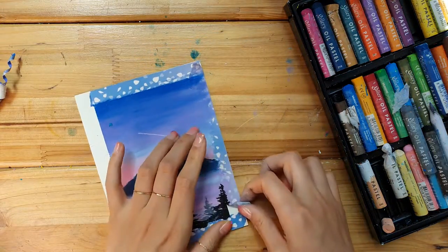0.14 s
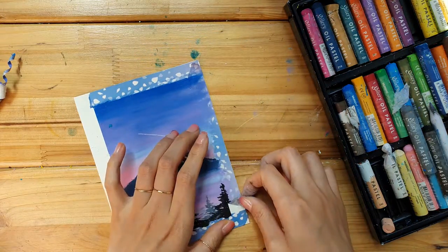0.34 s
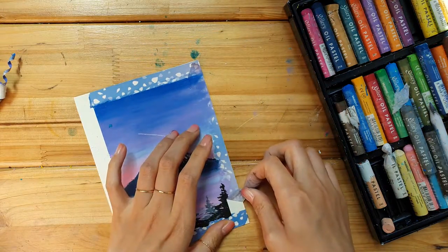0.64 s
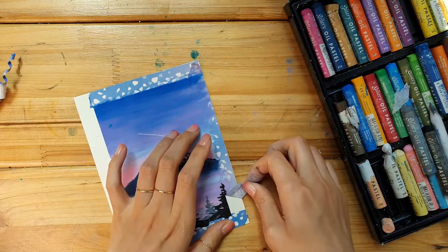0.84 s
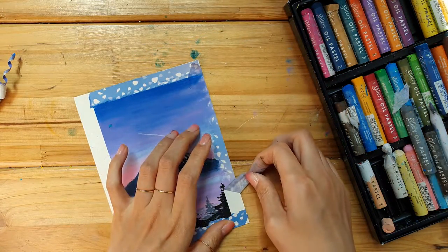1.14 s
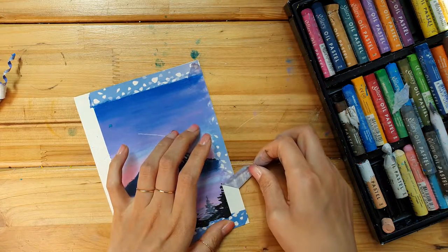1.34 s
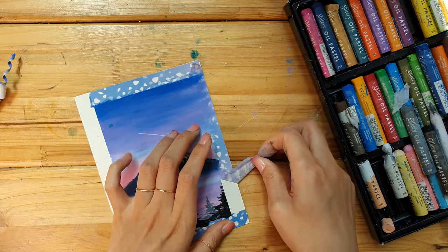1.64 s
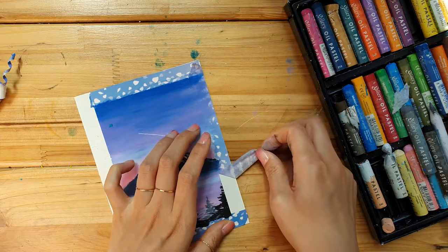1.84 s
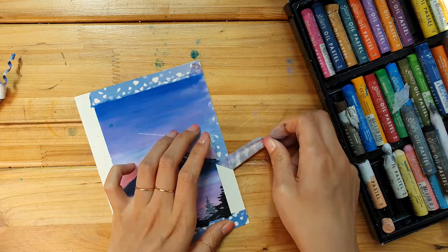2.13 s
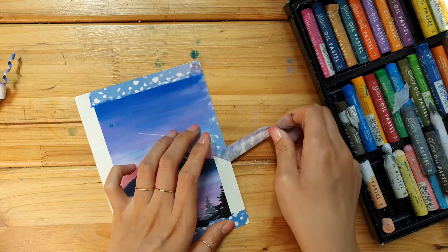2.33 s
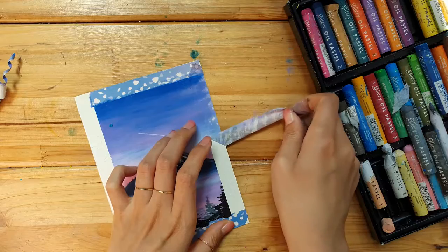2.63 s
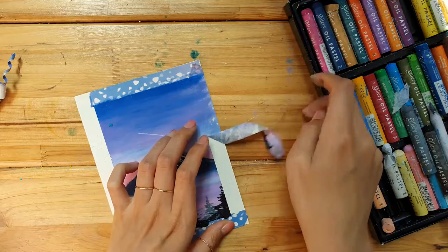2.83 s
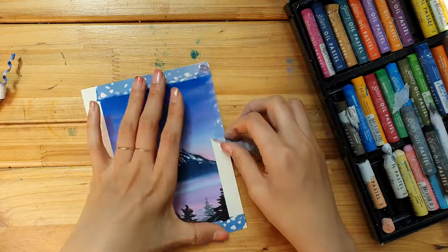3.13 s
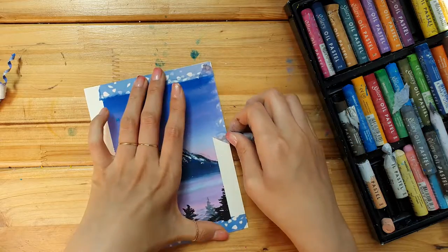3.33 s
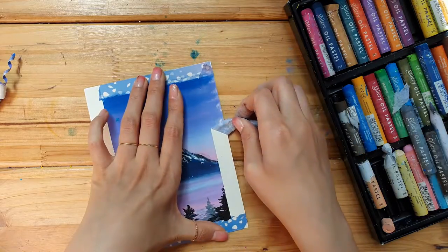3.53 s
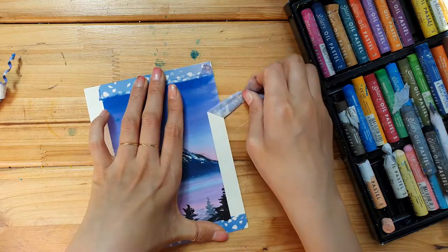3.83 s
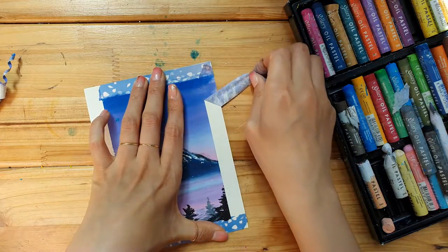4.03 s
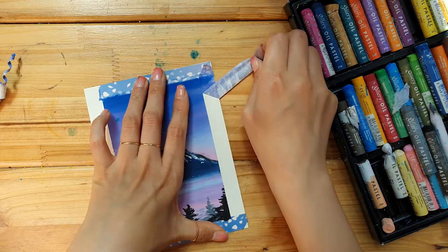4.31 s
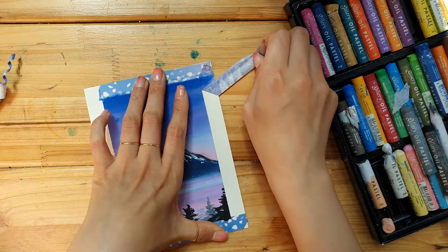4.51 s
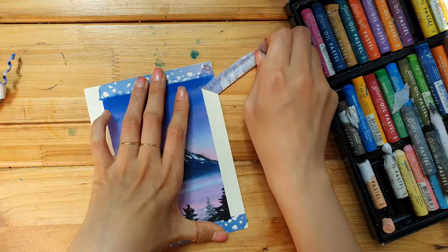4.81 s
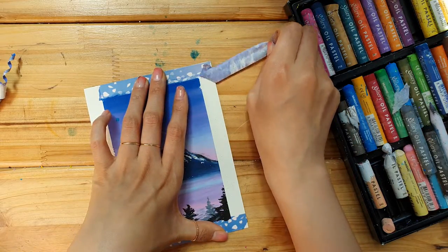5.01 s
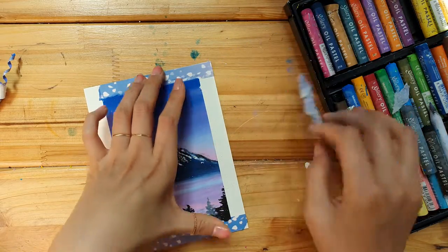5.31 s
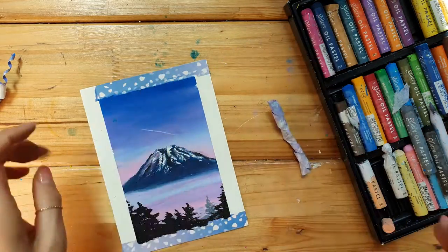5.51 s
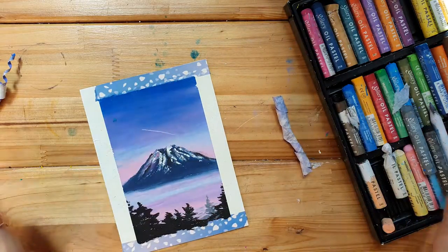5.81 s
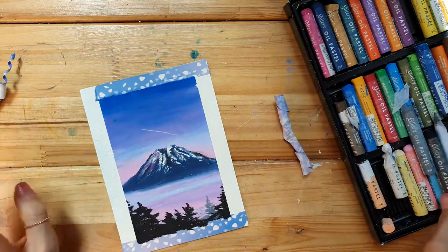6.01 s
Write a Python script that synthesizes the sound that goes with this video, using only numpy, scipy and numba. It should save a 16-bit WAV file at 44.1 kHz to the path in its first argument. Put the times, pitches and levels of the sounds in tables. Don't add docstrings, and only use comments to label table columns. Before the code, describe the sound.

A low, unsteady hum of traffic fills a small room while a distant engine rises in pitch, drops at a gear change and rises again. Close by, hands bump a wooden desk and sticky tape tears slowly from paper, fine and scratchy, pulling in uneven bursts with tiny ticks. After another bump the peeling resumes, fuller; then brief crumpling, soft thuds and a light hard rap at the end.

```python
import sys
import numpy as np
from scipy import signal
from scipy.fft import rfft, irfft, next_fast_len
from scipy.io import wavfile
from scipy.ndimage import uniform_filter1d
from numba import njit

SR = 44100
rng = np.random.default_rng(int(sys.argv[2]) if len(sys.argv) > 2 else 0)


def makeup_ratio(level_db):
    decades = np.asarray(level_db, float) / 20
    return 10 ** decades


def persist_wave(psi):
    counts = np.round(np.clip(psi, -1, 1) * 32767).astype(np.int16)
    wavfile.write(sys.argv[1], SR, np.atleast_2d(counts).T)


N = 271347
PADDED = next_fast_len(N)


def rms_one(x):
    return x / np.sqrt(np.mean(x ** 2) + 1e-20)


def in_time(rows):
    s, *columns = np.transpose(rows)
    return [np.interp(np.arange(N) / SR, s, c) for c in columns]


def at_hz(points, hz):
    points_hz, values = np.transpose(points)
    return np.interp(np.log(hz), np.log(points_hz), values)


def peaks_db(resonances, hz):
    return sum(db / (1 + ((hz - f) / (width / 2)) ** 2) for f, width, db in resonances)


def drift(rate_hz):
    r = np.exp(-2 * np.pi * rate_hz / SR)
    noise = rng.standard_normal(N + SR)
    return rms_one(signal.lfilter([1], [1, -2 * r, r * r], noise)[SR:])


def panned(x, pan_db):
    return x * makeup_ratio(np.array([pan_db / 2, -pan_db / 2])).reshape(2, -1)


def band_pass(x, edges_hz):
    return signal.sosfilt(signal.butter(2, edges_hz, "band", fs=SR, output="sos"), x)


def ring(clicks, hz, t60_s):
    r, w = makeup_ratio(-60 / (t60_s * SR)), 2 * np.pi * hz / SR
    return signal.lfilter([0, np.sin(w)], [1, -2 * r * np.cos(w), r * r], clicks + 1e-18)


def swells(rows, shape):
    coarse_s = np.arange(0, N + 32, 32) / SR
    s, db, rise_s, fall_s = np.transpose(rows)[:4, :, None]
    before = (s - coarse_s) / np.maximum(rise_s, 1e-3)
    after = (coarse_s - s) / np.maximum(fall_s, 1e-3)
    apart = np.where(coarse_s < s, before, after)
    power = makeup_ratio(np.maximum(db - 20 * apart ** shape, -150)) ** 2
    total = power.sum(axis=0)

    def fine(v):
        return np.interp(np.arange(N) / SR, coarse_s, v)

    extra = [fine(c @ power / total) for c in np.transpose(rows)[4:]]
    return fine(10 * np.log10(total)), *extra


# Hz, level in dB per Hz.
STREET = [(12, -59), (20, -27.5), (43, -31), (92, -4.5), (124, -4), (217, -8.5), (347, -14.5), (398, -21),
          (555, -18.5), (841, -21.5), (966, -20.5), (1730, -29), (2410, -39), (10800, -56), (15000, -64)]
# time in seconds, level in dB.
STREET_SWELL = [(0.0, -58), (0.72, -60), (3.01, -58.5), (4.3, -58.5), (5.7, -59.5), (6.15, -58)]
# centre in Hz, width in Hz, lift in dB.
ROOM_MODES = [(86, 26, 2), (161, 54, 2.5), (282, 28, 4.5), (352.3, 8.1, 7), (431, 53, 4.5), (546, 46, 8.5),
              (953, 35, 6.5), (1387, 60, 4), (2150, 100, 1.5)]
# Hz, correlation from -1 to 1.
LIKENESS = [(25, .6), (42, 0.51), (65, 0.94), (130, 0.99), (250, 0.98), (400, 0.8), (640, 0.53),
            (1410, 0.41), (3100, -0.33), (15000, 0.3)]
# Hz, left over right in dB.
LEAN = [(60, 0), (180, -2.5), (550, -1), (1650, 1.5), (4970, 1.5), (15000, 0)]


def street():
    hz = np.maximum(np.fft.rfftfreq(PADDED, 1 / SR), 1)
    alike = np.clip(at_hz(LIKENESS, hz), -1, 1)
    mid, side = rfft(rng.standard_normal((2, PADDED)))
    pair = np.sqrt(1 + alike) * mid + np.sqrt(1 - alike) * side * [[1], [-1]]
    pair = panned(pair * makeup_ratio(at_hz(STREET, hz) + peaks_db(ROOM_MODES, hz)), at_hz(LEAN, hz))
    inside = (hz > 220) & (hz < 2000)
    scale = np.sqrt(2 * np.sum(np.abs(pair.mean(axis=0)[inside]) ** 2)) / PADDED
    flicker = makeup_ratio(0.6 * drift(6))
    return irfft(pair / scale, PADDED)[:, :N] * makeup_ratio(in_time(STREET_SWELL)[0]) * flicker


# peak in seconds, level in dB, build-up in seconds, dying in seconds.
RUMBLES = [(.07, -45, 0.18, 0.15), (.28, -46.5, 0.4, 0.25), (.49, -47, 0.22, 0.16), (.72, -47, 0.032, 0.1),
           (.89, -54.5, .11, 0.052), (1.01, -44.5, 0.044, 0.076), (1.22, -55, 0.34, 0.21),
           (1.49, -41.5, .08, 0.16), (1.95, -49, 0.25, 0.15), (2.14, -49.5, 0.3, .2),
           (2.52, -51.5, 0.29, 0.84), (2.9, -55, 0.77, 0.34), (3.16, -44, 0.13, 0.14),
           (3.39, -53, 0.038, .4), (3.6, -44.5, 0.13, 0.13), (3.87, -43.5, 0.2, 0.13),
           (4.05, -36, 0.1, 0.06), (4.21, -45, .03, 0.27), (4.35, -33, 0.12, 0.08),
           (4.54, -38, 0.047, 0.059), (4.66, -44, 0.049, 0.29), (4.93, -47.5, 0.046, 0.51),
           (5.33, -48, 0.055, 0.17), (5.46, -47.5, 0.081, 0.22), (5.77, -48, .45, 0.12),
           (5.89, -48.5, 0.13, 0.09), (6.08, -45.5, 0.098, 0.089)]


def drone():
    mode_hz, wander_hz = 114.5, 4.18
    turn = 2 * np.pi * np.cumsum(mode_hz + wander_hz * drift(9.32)) / SR
    level_db = swells(RUMBLES, shape=0.99)[0] + 1.1 * drift(23)
    return np.sqrt(2) * makeup_ratio(level_db) * np.sin(turn)


# time in seconds, firing rate in Hz, level in dB.
LOW_GEAR = [(0, 141.7, -58), (.3, 147, -54), (.6, 155, -69), (1.2, 168, -52.5), (1.5, 173.7, -62),
            (1.62, 176.1, -51.5), (2.1, 183.7, -57), (2.7, 189.7, -57), (3.05, 197.6, -58)]
# time in seconds, firing rate in Hz, level in dB.
HIGH_GEAR = [(2.95, 96.7, -58.5), (3.6, 102.3, -57.5), (4.05, 110.5, -52), (4.2, 114.7, -55.5),
             (4.37, 118.6, -51.5), (4.8, 128.3, -55), (5.2, 132, -51.5), (5.55, 134.3, -53),
             (5.95, 132.6, -62)]
# centre in Hz, width in Hz, lift in dB.
WINDOW = [(299, 50, 24.5), (352, 23, 14), (560, 68, 23)]


def engine(gear):
    hz, level_db = in_time(gear)
    s = np.arange(N) / SR
    on = np.clip(np.minimum(s - gear[0][0] + 0.04, gear[-1][0] - s) / 0.062, 0, 1)
    third_db = -90 + peaks_db(WINDOW, 3 * hz)
    turn = 2 * np.pi * np.cumsum(hz * (1 + 0.0029 * drift(6.6))) / SR
    return on * np.sqrt(2) * (makeup_ratio(level_db) * np.sin(turn) + makeup_ratio(third_db) * np.sin(3 * turn))


# Hz, level in dB, t60 in seconds.
DESK = [(232, 6, 0.09), (331.3, 12.5, 0.06), (540, 8, 0.051), (980, -1, 0.018), (1220, 7, 0.013),
        (1470, 14.5, 0.013), (1796, 10.5, 0.012), (2160, 11, 0.012)]
# start in seconds, level in dB, centre in Hz, width in octaves, decay in seconds.
THUDS = [(0.067, -63, 9800, 1.2, 0.036), (.0755, -53, 7200, 1.1, 0.058), (0.075, -52, 1750, 0.92, 0.15),
         (2.947, -49.5, 560, 2.9, 0.14), (2.949, -52, 1860, 1.6, 0.15), (5.701, -49, 510, 0.73, 0.28),
         (5.699, -50, 1100, 0.97, 0.28), (5.703, -55, 1880, 0.7, 0.3), (5.66, -82, 4400, 0.21, 0.7),
         (5.74, -55.5, 1000, 1.1, 0.32), (5.2, -60, 2130, 0.42, .2)]
# start in seconds, level in dB, centre in Hz, width in octaves,
# decay in seconds.
RAPS = [(.07, -57, 3160, 0.46, 0.19), (.076, -61, 2300, 0.94, 0.19), (.078, -49, 473, 1.6, 0.23),
        (2.953, -63, 2780, 0.7, 0.089), (5.132, -58, 2600, 1.9, 0.23), (5.243, -74, 4200, 1.4, .08),
        (5.353, -66.5, 3500, 2.3, 0.13), (5.868, -47.5, 650, 1.3, 0.097), (5.889, -57, 2170, 0.59, 0.12)]


def desk():
    out, length = np.zeros((2, N)), 9000
    fade_s = np.arange(length) / SR
    trebles_db = [-45] * len(THUDS) + [-14.5] * len(RAPS)
    for (s, level_db, hz, octaves, decay_s), treble_db in zip(THUDS + RAPS, trebles_db):
        noise = rng.standard_normal((3, length))
        rise = 1 - np.exp(-fade_s / (0.0047 * decay_s))
        shake = (0.71 * noise[0] + 0.86 * noise[1:]) * rise * makeup_ratio(-60 * fade_s / decay_s)
        edges_hz = hz * 2 ** (np.array([-octaves, octaves]) / 2)
        thud = band_pass(shake, edges_hz)
        thud += sum(0.0051 * makeup_ratio(db) * ring(thud, f, t60_s) for f, db, t60_s in DESK)
        thud *= np.sqrt(SR / 4 / (edges_hz[1] - edges_hz[0]))
        rustle = band_pass(shake, [4500, 13000])
        at = round(s * SR)
        out[:, at:at + length] += (makeup_ratio(level_db) * (thud + makeup_ratio(treble_db) * rustle))[:, :N - at]
    return out


# start in seconds, peak in dB, ring in Hz, t60 in seconds, left over right in dB.
TAPS = [(.0672, -40.5, 900, 0.0052, -4), (0.0758, -35.5, 537, 0.033, 2), (.109, -52, 700, 0.0092, 3),
        (2.946, -40, 795, 0.0087, 3), (2.958, -43, 520, 0.018, -4), (5.709, -51, 560, 0.01, -1),
        (5.744, -44, 260, .014, 0), (5.8663, -40.5, 2020, 0.017, -6), (5.8728, -49, 2300, .008, -2.5),
        (5.8725, -51, 800, 0.0087, 0)]


def taps():
    out = np.zeros((2, N))
    for s, peak_db, hz, t60_s, pan_db in TAPS:
        push = np.zeros(2000)
        push[0] = -makeup_ratio(peak_db)
        at = round(s * SR)
        out[:, at:at + 2000] += panned(ring(push, hz, t60_s), pan_db)
    return out


# start in seconds, peak in dB, ring in Hz,
# left over right in dB.
SNAPS = [(0.4263, -54, 11400, 6.0), (1.245, -57, 8690, 3), (1.3493, -52, 8500, 4),
         (1.4862, -48.5, 8480, 4.5), (1.5473, -54, 12800, 4.5), (1.9902, -51, 10500, 2),
         (2.157, -54.5, 10200, 9), (2.5088, -50, 7220, 6), (2.592, -49, 7150, 0), (2.6983, -48, 7160, -7),
         (2.7775, -58, 11500, 14), (2.7885, -40, 7440, 5), (2.7984, -55, 7300, 11), (2.846, -45, 9500, 2.5),
         (2.8594, -52, 6540, 0), (2.906, -51, 12800, 0), (2.917, -41, 7890, 6.5), (2.9468, -45, 3230, -1),
         (2.9514, -40, 3070, 8), (3.778, -56, 12500, 0), (4.09, -59, 14000, 1), (4.1194, -51.5, 3330, -2),
         (5.134, -40.5, 12000, 6), (5.1804, -48, 12900, 1), (5.2413, -47, 12710, 7), (5.246, -37, 12900, 3),
         (5.269, -44, 10900, 2), (5.3527, -55, 13600, -1), (5.3689, -40.5, 13000, 5.5),
         (6.0808, -60, 3064, 4)]
# start in seconds, peak in dB, centre in Hz, left over right in dB.
TICKS = [(.3585, -62, 12000, 5), (.378, -57, 11100, 5.5), (.3945, -58, 11400, 3), (.443, -63, 11000, 6),
         (.482, -59, 11100, 6), (.681, -55, 11000, 7.5), (.697, -61, 11000, 7), (.883, -55, 8430, 2),
         (1.1085, -61, 12500, 7), (1.2265, -60, 12500, 8), (1.2895, -56, 7920, 6.5),
         (1.4685, -48, 8330, 5.5), (1.578, -61, 7200, 6.5), (1.7505, -62, 9700, 8),
         (1.7745, -57, 10300, 7.5), (1.856, -61, 12500, 5.5), (1.9285, -57, 12000, 5),
         (1.9545, -57, 10300, 3), (2.0755, -51, 10000, 4.5), (2.088, -57, 10040, 4.5),
         (2.253, -56, 12500, 4), (2.3045, -50, 10500, 3), (2.3535, -57, 9000, 0), (2.3865, -53, 9000, 2),
         (2.4145, -54, 9000, 2), (2.724, -57, 11000, 0), (2.748, -59, 4500, 0), (2.7866, -56, 7000, 0),
         (2.7905, -44, 8000, 2), (2.8475, -48.5, 4687, 0), (3.462, -51, 7300, 2), (3.612, -61, 6370, 2.5),
         (3.7215, -53, 6560, 0), (3.826, -54, 6030, 1), (4.136, -61, 3320, 0), (4.941, -57, 10400, 2.5),
         (5.045, -63, 7210, 7), (5.1375, -49, 11000, 3.5), (5.2485, -53, 15000, 3), (5.282, -56, 12500, 3),
         (5.2915, -58, 5000, 3), (5.3715, -50, 14500, 6), (5.8672, -44.5, 5000, 0), (5.873, -53, 6500, 0),
         (6.0375, -67, 4120, 1)]


def snaps(rows, t60_s, broad, fibres, low_hz):
    out, length = np.zeros((2, N)), 900
    fade_s = np.arange(length) / SR
    tick = np.zeros(length)
    tick[:2] = 1, -1
    for s, peak_db, hz, pan_db in rows:
        tear = rng.standard_normal((2, length))
        body = broad * tick + ring(np.abs(tick) / 2, hz, t60_s)
        puff = fibres * np.diff(tear, prepend=0) * makeup_ratio(-60 * fade_s / 0.012)
        at = round(s * SR)
        out[:, at:at + length] += panned(makeup_ratio(peak_db) * (body + puff), pan_db)[:, :N - at]
    out[1] = np.roll(out[1], 1)
    return signal.sosfilt(signal.butter(2, low_hz, "high", fs=SR, output="sos"), out)


@njit
def sliding(x, cosine, r):
    y, z = np.zeros(len(x)), np.zeros(len(x))
    for i in range(2, len(x)):
        gain, pull, loss = (1 - r[i] ** 2) / 2, 2 * r[i] * cosine[i], r[i] ** 2
        y[i] = gain * (x[i] - x[i - 2]) + pull * y[i - 1] - loss * y[i - 2]
        z[i] = gain * (y[i] - y[i - 2]) + pull * z[i - 1] - loss * z[i - 2]
    return z


def two_paths(edges, across=0.18):
    out = np.array([edges[0] + across * np.roll(edges[1], 13),
                    edges[1] - across * np.roll(edges[0], 22)])
    bounces = [[(31, -0.24), (90, 0.45), (203, 0.43)], [(44, 0.35), (117, -0.51), (260, 0.42)]]
    for side in (0, 1):
        out[side] += sum(share * np.roll(out[side], lag) for lag, share in bounces[side])
    return out


# start in seconds, lowest ring of the free strip at once in Hz,
# ring it settles to in Hz, left over right in dB, slackness that widens the rings (factor).
GRIPS = [(0, 11500, 10700, 9, 0.88), (.53, 10700, 10300, 7, 1.6), (0.789, 8500, 8200, 6.5, 1.1),
         (1.02, 8860, 8300, 10.5, 0.99), (1.43, 7340, 6900, 7.5, 1.13), (3.1, 12300, 12400, 10, 1.1),
         (3.36, 7070, 6340, 6.5, 1.8), (3.7, 6050, 5730, 4, 1.1), (4.7, 6060, 6960, 6, 1.5),
         (5.125, 6400, 9000, 3, 1.4), (5.19, 11400, 10500, 4, 1.4), (5.6, 4100, 4000, 2, 2.2)]


def free_strip():
    settle_s, hand_db_per_s = 0.5, -4.5
    s = np.arange(N) / SR
    starts_s = [grip[0] for grip in GRIPS]
    held = np.maximum(np.searchsorted(starts_s, s, "right") - 1, 0)
    grip_s, first_hz, settled_hz, pan_db, slack = np.array(GRIPS)[held].T
    since_s = s - grip_s
    glide_hz = settled_hz + (first_hz - settled_hz) * np.exp(-since_s / settle_s)
    return glide_hz * (1 + 0.02 * drift(8.8)), pan_db + hand_db_per_s * since_s, slack


# ratio to its lowest ring, width as a share of the mode's Hz, level in dB.
STRIP = [(1.016, 0.17, 1.5), (1.196, 0.15, 0.5), (1.45, 0.15, -0.5), (1.67, 0.33, -2.5), (2.17, 0.39, -6.5),
         (0.87, 0.096, -4.5), (0.75, 0.19, -19.5)]
# centre in Hz, width in Hz, level in dB.
PAPER = [(13400, 3300, -12), (15600, 900, -1)]
# peak in seconds,
# crackle in dB, build-up in seconds, let-go in seconds, brightness in dB per octave.
TUGS = [(.39, -72, 0.075, 0.24, -9), (.49, -72, .17, 0.078, -11), (.564, -81, .1, 0.088, -7),
        (.69, -77, 0.07, 0.06, -13), (.91, -70, 0.068, 0.051, -7), (1.08, -85, 0.16, .3, 7),
        (1.362, -69.5, .33, 0.094, -6), (1.49, -72, 0.11, 0.045, 1), (1.59, -79, .25, .05, -8),
        (1.784, -73.5, 0.2, 0.026, 2), (1.954, -66, 0.16, .09, 7), (2.1, -64, 0.049, .022, 1),
        (2.17, -77, 0.34, 0.46, 4), (2.29, -63.5, .055, 0.068, -2), (2.37, -71, 0.052, 0.1, -2),
        (2.52, -64, 0.04, 0.2, -5), (2.62, -67.5, 0.2, 0.087, -8), (2.698, -79.5, .04, .05, -2),
        (2.789, -61, .008, .025, -16), (2.855, -68, 0.079, .03, -11), (2.92, -77, 0.028, 0.029, -6),
        (2.953, -66, 0.024, 0.02, -11), (3.21, -84.5, 0.058, .05, -14),
        (3.47, -62.5, 0.027, 0.085, -11.5), (3.63, -67, 0.11, 0.098, -7),
              (3.732, -64, 0.072, .25, -2.5), (3.81, -70.5, .2, 0.17, -12), (3.856, -63.5, 0.12, 0.042, -6),
              (3.91, -65, 0.13, 0.034, -3), (4.06, -62.5, 0.17, 0.057, -2.5), (4.17, -76, 0.4, 0.055, 3),
              (4.3, -85.5, .2, 0.25, -6), (4.45, -83, 0.085, .06, 1), (4.944, -74, 0.029, 0.14, 2),
              (5.058, -70.5, 0.035, 0.25, -11), (5.136, -60.5, .005, 0.05, -3),
              (5.158, -59, 0.06, 0.02, -10), (5.185, -78, .015, .03, 4), (5.228, -82, 0.036, .02, 3),
              (5.245, -63, 0.0046, .025, -7), (5.29, -73, .03, 0.046, -5), (5.368, -72, .026, .035, -1),
              (5.868, -62, .003, 0.022, -3), (5.897, -67, 0.035, .025, -3), (5.944, -75, .06, 0.06, -8),
              (6.04, -77, .02, 0.034, -1), (6.083, -80, .012, 0.034, 1)]


def peel(per_s=6000, size_db=2.6, clump_db=1.95, flex_db=2.2):
    level_db, tilt_db = swells(TUGS, shape=1.0)
    low_hz, pan_db, slack = free_strip()
    born = rng.random(N) < per_s / SR
    sizes = makeup_ratio(size_db * np.minimum(rng.exponential(1, N), 5))
    breaks = born * sizes * rng.choice([-1, 1], N)
    dealt = rng.integers(0, 4, N)
    large = np.abs(breaks) > makeup_ratio(3.2 * size_db)
    edges = np.zeros((2, N))
    for k, (ratio, share, mode_db) in enumerate(STRIP):
        angle = 2 * np.pi * np.minimum(ratio * low_hz, 17500) / SR
        loosened = slack if ratio > 1 else 1
        r, cosine = np.exp(-share * loosened * angle / 2), np.cos(angle)
        reach = makeup_ratio(mode_db + tilt_db * np.log2(ratio) + flex_db * drift(9.4))
        if ratio < 1:
            reach *= makeup_ratio(0.27 * np.clip(level_db + 70.0, -20, 8))
        for edge in (0, 1):
            hits = breaks * ((dealt == 2 * edge + k % 2) | large)
            edges[edge] += reach * sliding(hits, cosine, r)
    for hz, width_hz, mode_db in PAPER:
        r = np.full(N, np.exp(-np.pi * width_hz / SR))
        cosine = np.full(N, np.cos(2 * np.pi * hz / SR))
        reach = makeup_ratio(mode_db + tilt_db + 0.4 * np.clip(level_db + 71.5, -20, 8))
        for edge in (0, 1):
            edges[edge] += reach * sliding(breaks * (dealt // 2 == edge), cosine, r)
    sound = signal.sosfilt(signal.butter(4, 16000, fs=SR, output="sos"), two_paths(edges))
    sound = sound / np.sqrt(uniform_filter1d(np.mean(sound ** 2, axis=0), size=4001))
    clumps = makeup_ratio(clump_db * drift(32) + 1.0 * drift(170))
    return panned(sound * rms_one(clumps) * makeup_ratio(level_db + 2.23), pan_db)


def room(x):
    t60_s, level_db = 0.065, -7
    fade_s = np.arange(round(0.3 * SR)) / SR
    tail = rng.standard_normal((2, len(fade_s))) * makeup_ratio(-60 * fade_s / t60_s) * (fade_s > 0.003)
    tail = signal.lfilter([1], [1, -0.4], tail)
    tail /= np.sqrt(np.sum(tail ** 2, axis=1, keepdims=True))
    return makeup_ratio(level_db) * signal.fftconvolve(x, tail, axes=1)[:, :N]


def scene():
    lows = drone() + engine(LOW_GEAR) + engine(HIGH_GEAR)
    near = desk() + taps() + peel()
    near += snaps(SNAPS, t60_s=0.0057, broad=0.37, fibres=0.23, low_hz=3500)
    near += snaps(TICKS, t60_s=0.0024, broad=0.4, fibres=0.18, low_hz=2500)
    return street() + panned(lows, -0.55) + near + room(near)


def low_pass(x):
    return signal.sosfilt(signal.butter(12, 16450, fs=SR, output="sos"), x)


TOP_BANDS_HZ = [12000, 13100, 14300, 15100, 15830]


def record(dry):
    gate_db = -95.5
    hz, spectrum = np.fft.rfftfreq(PADDED, 1 / SR), rfft(dry, PADDED)
    out = irfft(spectrum * (hz < TOP_BANDS_HZ[0]), PADDED)[:, :N]
    for low_hz, high_hz in zip(TOP_BANDS_HZ, TOP_BANDS_HZ[1:]):
        band = irfft(spectrum * (hz >= low_hz) * (hz < high_hz), PADDED)[:, :N]
        is_loud = uniform_filter1d(np.mean(band ** 2, axis=0), size=2048) > makeup_ratio(gate_db) ** 2
        out += band * uniform_filter1d(is_loud * 1.0, size=512)
    return low_pass(out)


dry = scene()
out = record(dry)
persist_wave(out)
```